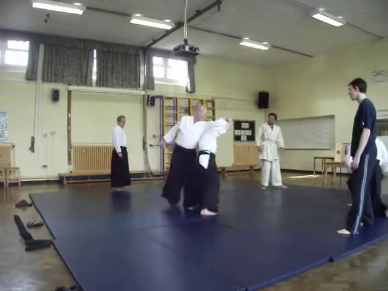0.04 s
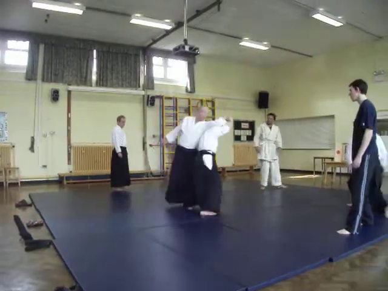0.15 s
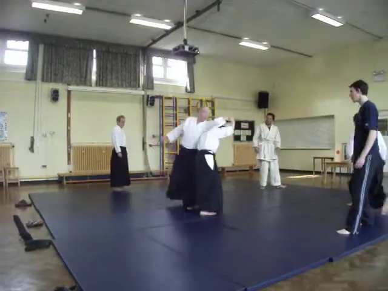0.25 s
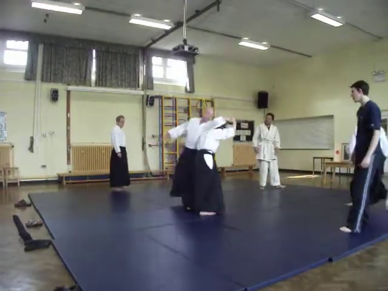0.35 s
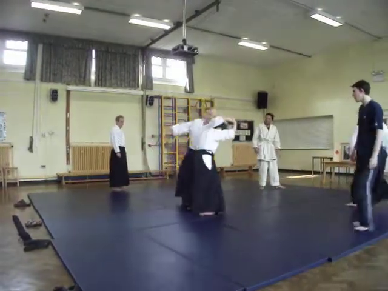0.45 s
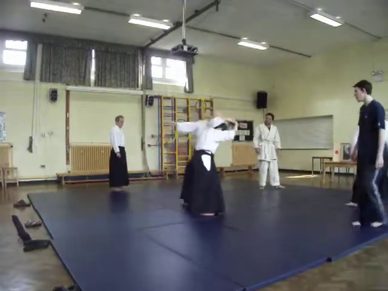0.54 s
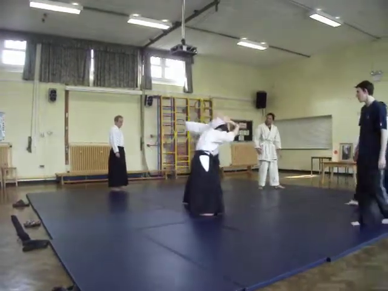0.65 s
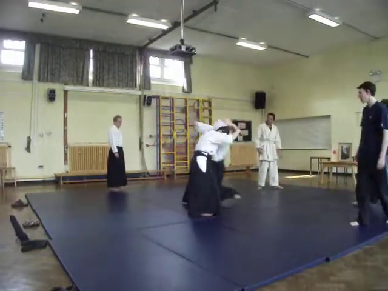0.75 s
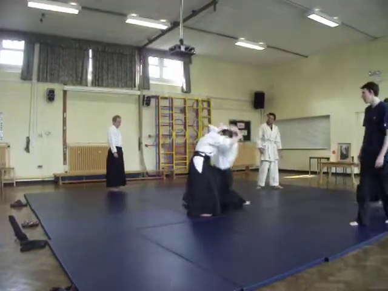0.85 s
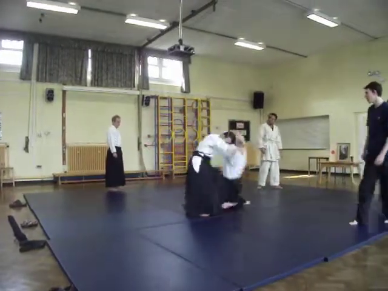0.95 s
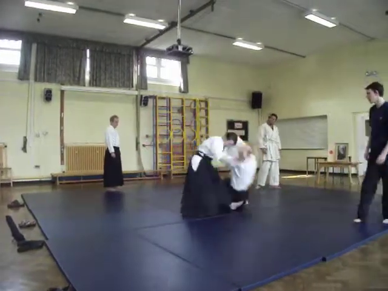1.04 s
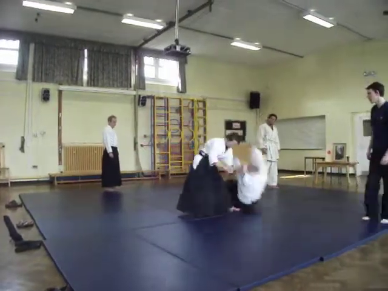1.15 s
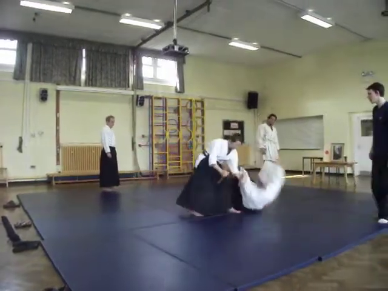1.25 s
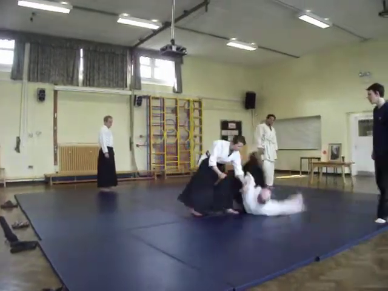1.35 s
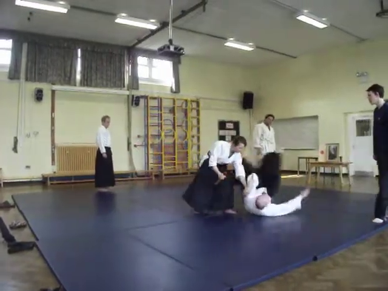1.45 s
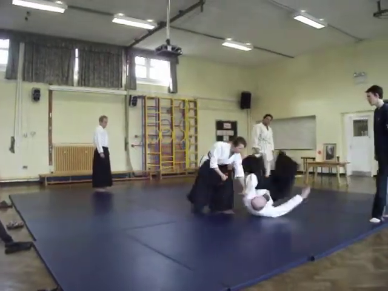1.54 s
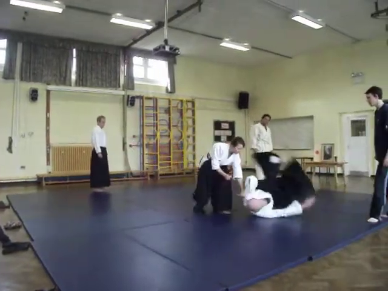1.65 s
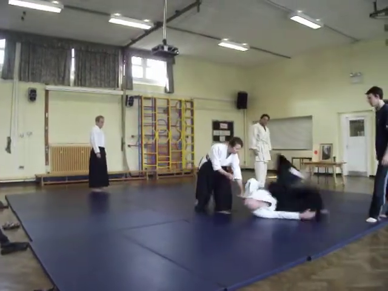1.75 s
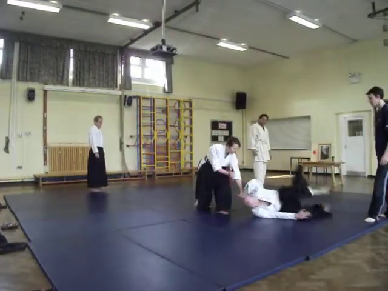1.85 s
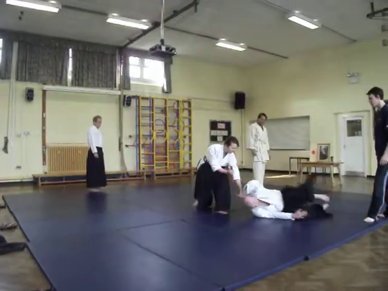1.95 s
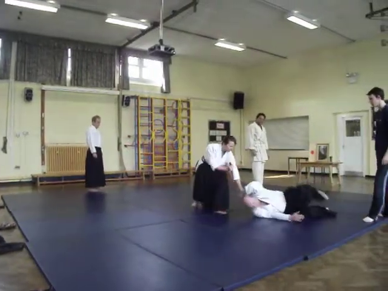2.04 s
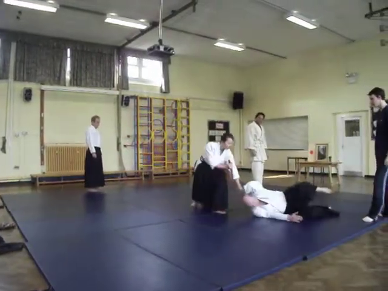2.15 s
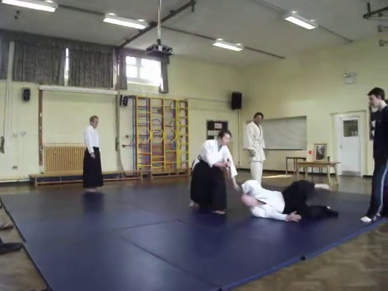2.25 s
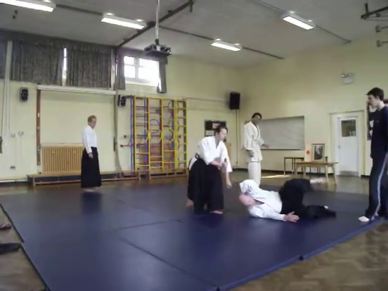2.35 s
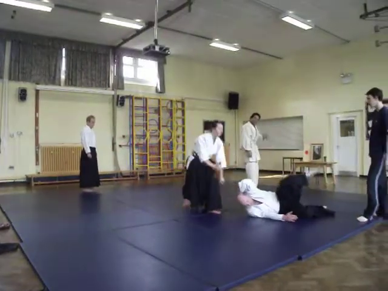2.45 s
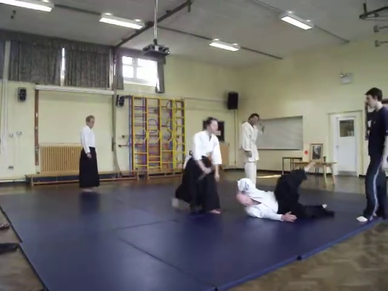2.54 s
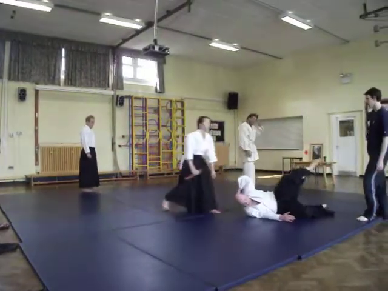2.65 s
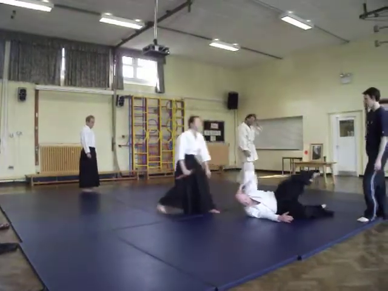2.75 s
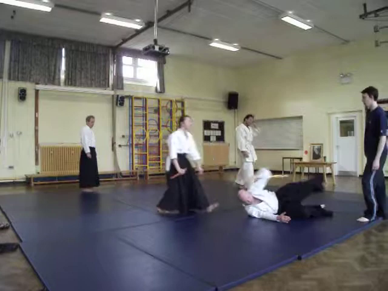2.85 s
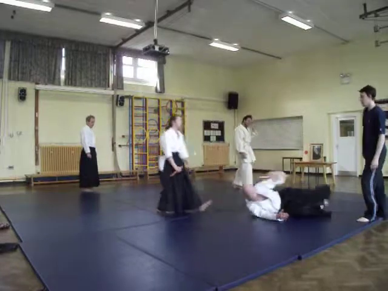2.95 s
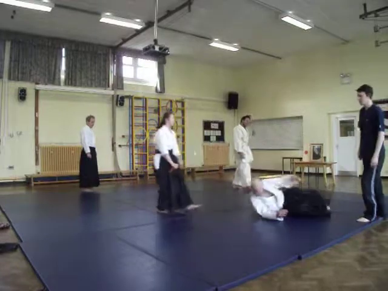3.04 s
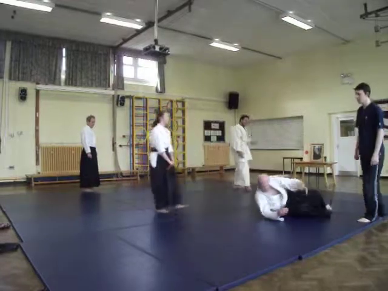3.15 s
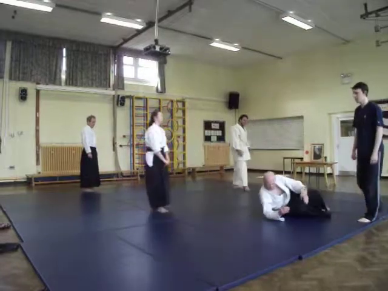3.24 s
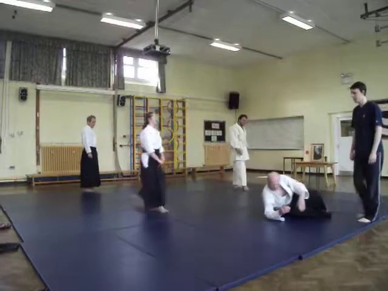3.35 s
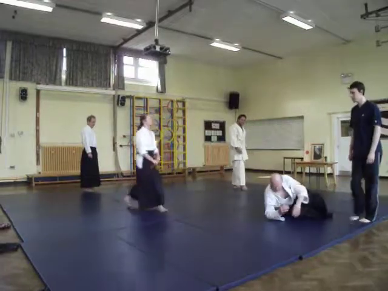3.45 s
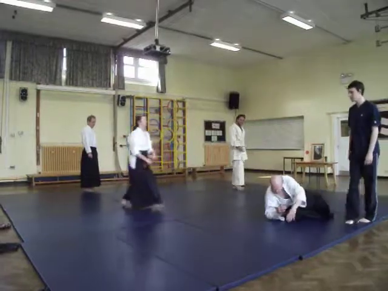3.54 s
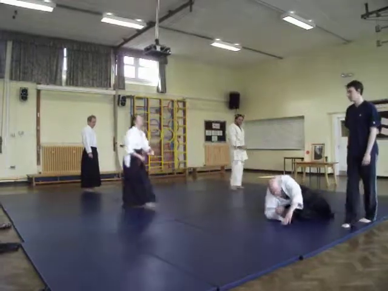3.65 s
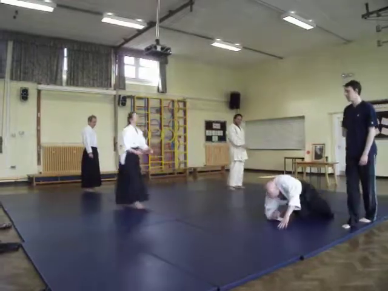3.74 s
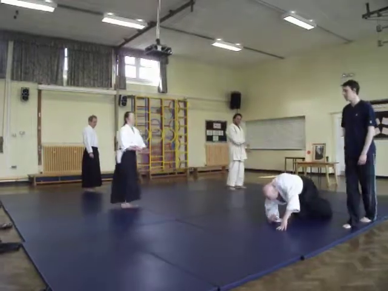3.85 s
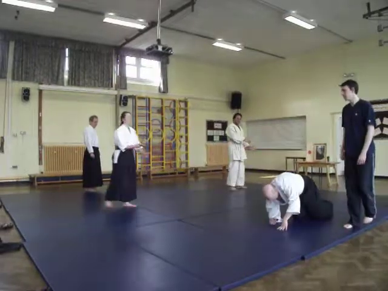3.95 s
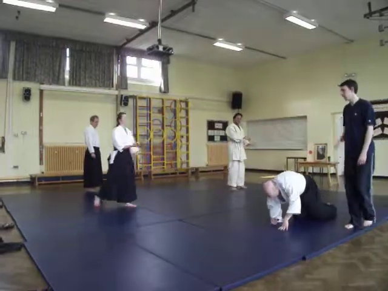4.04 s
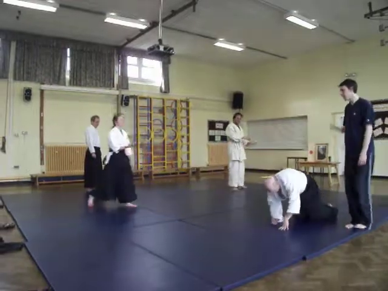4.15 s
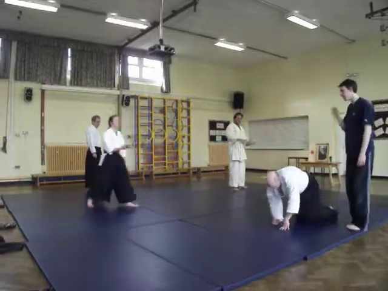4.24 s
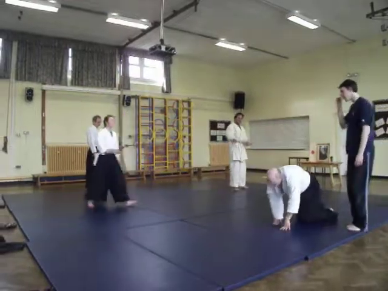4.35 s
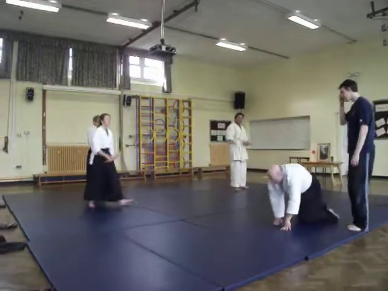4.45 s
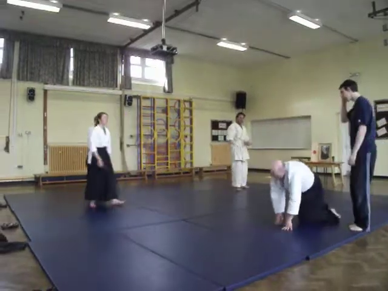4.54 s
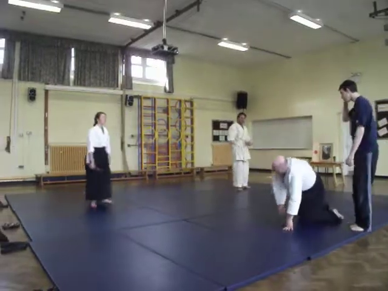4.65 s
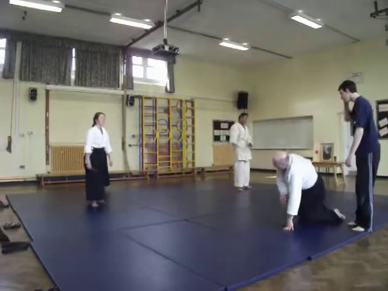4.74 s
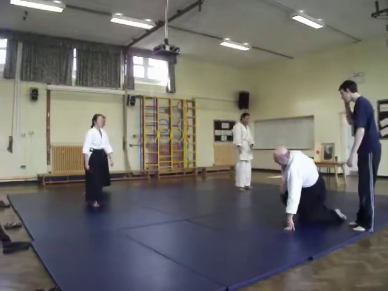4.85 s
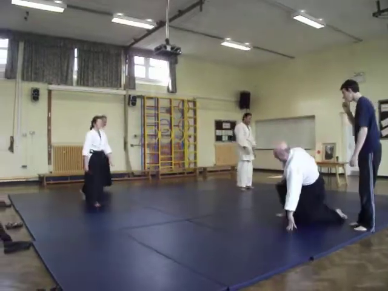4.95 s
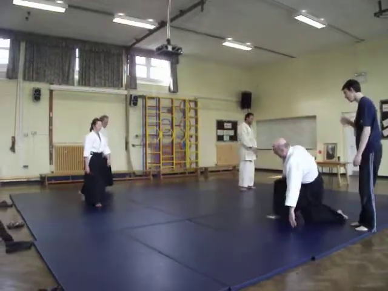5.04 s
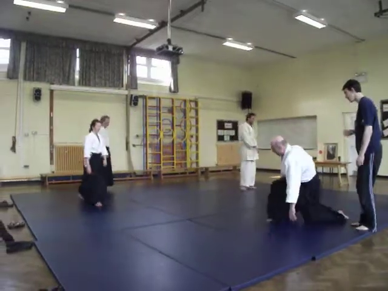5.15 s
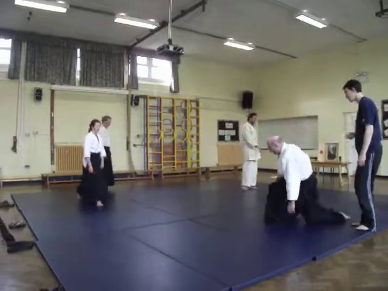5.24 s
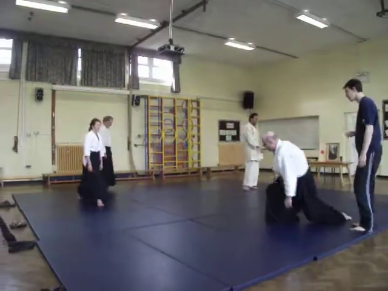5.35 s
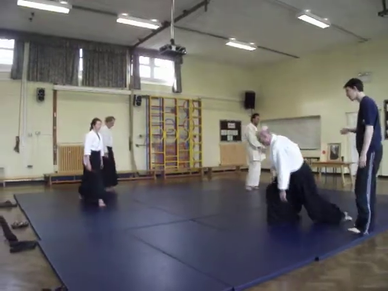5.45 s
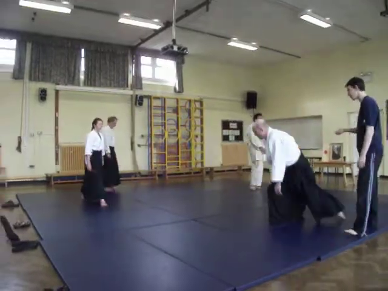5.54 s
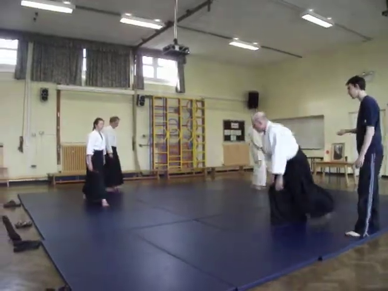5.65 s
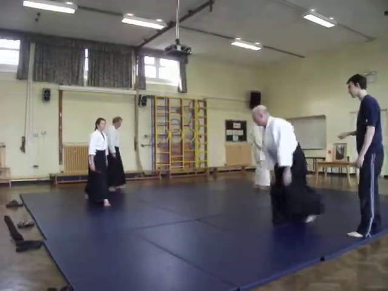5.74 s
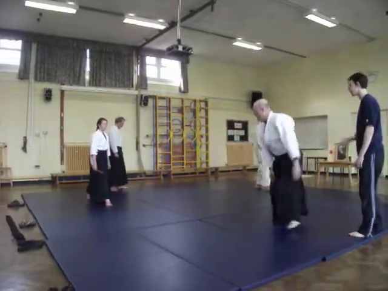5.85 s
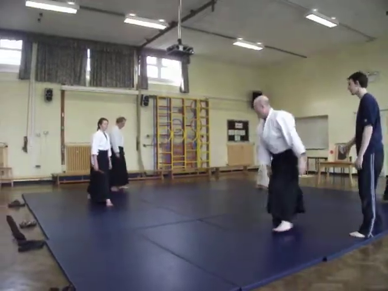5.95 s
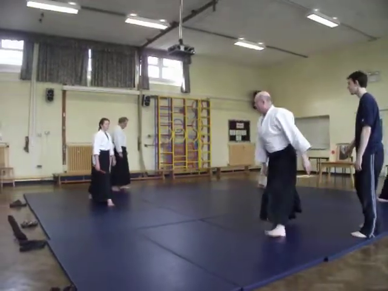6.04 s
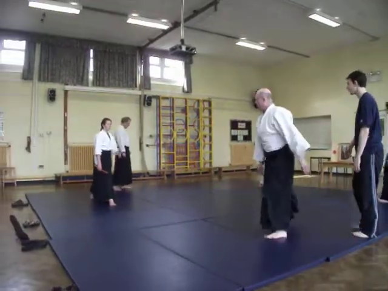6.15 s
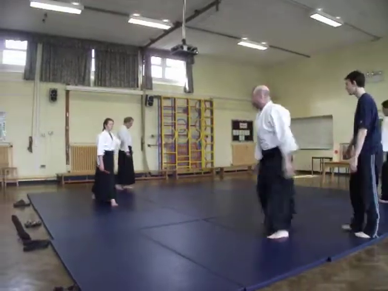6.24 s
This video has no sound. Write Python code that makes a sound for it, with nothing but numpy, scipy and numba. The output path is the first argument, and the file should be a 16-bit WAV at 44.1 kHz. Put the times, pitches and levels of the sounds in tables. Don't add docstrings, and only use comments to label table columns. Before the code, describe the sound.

In a reverberant gym hall, a small camera microphone hisses steadily over low rumble. Light foot knocks and a sharp slap on a padded mat come first, then a body lands hard: a loud clipped slap and hollow thud, followed by a tumble of further blows as the legs come down. The echo fades over about a second, leaving soft steps, dry ticks, small knocks and a faint low engine drone.

```python
import sys
import numpy as np
from scipy import signal
from scipy.fft import rfft, irfft
from scipy.io import wavfile
from scipy.ndimage import uniform_filter1d
from numba import njit

SR = 44100
rng = np.random.default_rng(int(sys.argv[2]) if len(sys.argv) > 2 else 0)


def invert_db(level):
    return 10 ** (np.asarray(level, dtype=float) / 20)


def wrap_up_sound(samples):
    columns = np.atleast_2d(samples).T
    tamed = np.clip(columns, -1, 1)
    steps = np.round(tamed * 32767).astype(np.int16)
    wavfile.write(sys.argv[1], SR, steps)


N = 278226


def table(rows, hz):
    f, v = np.transpose(rows)
    return np.interp(np.log(np.maximum(hz, 1)), np.log(f), v)


def colour(x, rows):
    size = 2 ** 13
    log_gain = table(rows, np.fft.rfftfreq(size, 1 / SR)) * np.log(10) / 20
    cepstrum = irfft(log_gain)
    cepstrum[1:size // 2] *= 2
    cepstrum[size // 2:] = 0
    impulse = irfft(np.exp(rfft(cepstrum)))
    return signal.fftconvolve(x, impulse)[:len(x)]


def band(x, lo_hz, hi_hz, order=2):
    return signal.sosfilt(signal.butter(order, [lo_hz, hi_hz], "band", fs=SR, output="sos"), x)


def unit(x):
    return x / np.sqrt(np.mean(x ** 2))


def peak_unit(x):
    return x / np.abs(x).max()


def walk(rate_hz):
    hold = int(SR / rate_hz)
    steps = np.repeat(rng.standard_normal(N // hold + 1), hold)
    return uniform_filter1d(uniform_filter1d(steps, hold), hold)[:N]


def add(out, start_s, sound):
    i = int(start_s * SR)
    out[i:i + len(sound)] += sound[:N - i]


def flicker(x, lo_hz, count, wobble_db):
    octave = np.log2(np.fft.rfftfreq(N, 1 / SR) / lo_hz + 1e-9)
    spectrum = rfft(x)
    out = 0
    for k in range(count):
        weight = np.cos(np.pi * np.clip(octave - k / 2, -.5, .5)) ** 2
        out = out + invert_db(wobble_db * walk(9)) * irfft(spectrum * weight, N)
    return unit(out)


# frequency_hz, density_db per Hz
RUMBLE_SPECTRUM = [(12, -30.5), (20, 2), (108, -10.5), (161, -6), (244, -13.5), (350, -5.5), (460, -40),
                   (770, -120)]


def rumble():
    return flicker(colour(rng.standard_normal(N), RUMBLE_SPECTRUM), 13, count=10, wobble_db=3.0)


# time_s, level_db
DRONE_LEVEL = [
    (0, -47),
    (.6, -69.5),
    (2.2, -42.5),
    (2.6, -39.5),
    (4.1, -50.5),
    (4.8, -53),
    (5.1, -46),
    (6.31, -37.5),
]


def drone():
    centre_hz = 79.7
    hum = unit(band(rng.standard_normal(N), centre_hz - 12, centre_hz + 12))
    return invert_db(np.interp(np.arange(N) / SR, *np.transpose(DRONE_LEVEL))) * hum


# frequency_hz, density_db per Hz
HISS_SPECTRUM = [(300, -4), (600, -7), (1100, -5.5), (1480, -9.5), (1800, -4.5), (2100, -9.5), (2500, -0.5),
                 (2850, 1), (3150, -5.5), (3500, -13.5), (4200, -22), (5000, -23.5), (5500, -30),
                 (6200, -50)]


def rustle_and_hiss():
    grit = 1 + (rng.random(N) < 40 / SR) * 6.
    hiss = colour(rng.standard_normal(N) * grit, HISS_SPECTRUM)
    rustle = flicker(hiss, 402.0, count=5, wobble_db=-1.0)
    upper = flicker(hiss, 375 * 2 ** 2.5, count=5, wobble_db=1.2)
    return rustle, upper


# time_s, stir_db
STIR_LEVEL = [(0, 3.5), (.7, -1.5), (1.2, 4), (2.3, -4), (2.65, -3), (3.2, -2), (3.8, -1), (4.2, 1.5),
              (5.0, 1), (5.6, 2.5), (6.31, 3.5)]


def air():
    stir_db = np.interp(np.arange(N) / SR, *np.transpose(STIR_LEVEL))
    rustle, hiss = rustle_and_hiss()
    return (invert_db(-41 + 0.34 * stir_db) * rumble() + drone()
            + invert_db(-42.5 + stir_db) * rustle + invert_db(-34.5 + 0.17 * stir_db) * hiss)


# frequency_hz, t60_s
HALL_DECAY = [(40, 1.3), (125, 1.17), (300, 1.04), (1000, 1.32), (3000, 1.14), (5500, 1.35)]


def hall(build_s=0.0063, sparse_db=3.5, clump_s=0.0017):
    t = np.arange(2 * SR) / SR
    hold = int(clump_s * SR)
    clump_level = np.repeat(rng.standard_normal(len(t) // hold + 1), hold)[:len(t)]
    clumps = invert_db(sparse_db * np.exp(-t / 0.14) * clump_level)
    out = 0
    for hz in 28 * 2 ** np.arange(0, 8.1, .5):
        echoes = band(rng.standard_normal(len(t)) * clumps, hz / 2 ** 0.22, hz * 2 ** 0.24)
        out = out + echoes * invert_db(-60 * t / table(HALL_DECAY, hz))
    out = out * (1 - np.exp(-t / build_s))
    return out / np.sqrt(np.sum(out ** 2))


# frequency_hz, width_hz, level_db
FLOOR_MODES = [(59, 14, -1.5), (120.6, 2.3, -6), (200, 23.3, -3), (270, 44, 0.5), (402, 40, -3.5)]


def boards(x):
    out = x
    for hz, width_hz, level_db in FLOOR_MODES:
        out = out + invert_db(level_db) * band(x, hz - width_hz / 2, hz + width_hz / 2, order=1)
    return out


# start_s, peak_db
TICK_EVENTS = [(0.28, -23), (0.677, -22.5), (0.768, -22), (0.786, -18.5), (0.794, -17), (0.8596, -22),
               (1.002, -21), (1.248, -23.5), (2.773, -17), (2.855, -20.5), (2.995, -23), (3.087, -21.5),
               (3.157, -24.5), (3.2, -22.5), (3.261, -22), (3.794, -21), (4.5646, -21.5), (4.647, -25),
               (4.9805, -21.5), (5.025, -27), (5.082, -22), (5.3533, -25), (5.415, -22), (5.4316, -18),
               (5.483, -19), (5.536, -25), (5.823, -24.5), (5.924, -23.5), (6.013, -26), (6.287, -20.5)]


def ticks():
    out, t = np.zeros(N), np.arange(SR // 40) / SR
    rise_s, decay_s = .001, .002
    for start_s, peak_db in TICK_EVENTS:
        grit = rng.standard_normal(len(t)) * (1 - np.exp(-t / rise_s)) * np.exp(-t / decay_s)
        ring = band(grit, 2300, 3150)
        top = band(grit, 3300, 4300, order=3)
        add(out, start_s, invert_db(peak_db) * (peak_unit(ring) + invert_db(-15) * peak_unit(top)))
    return out


SOLE_HZ = 211


def tick_bodies():
    silent_db = -60
    return [(s, db - 9, db - 18, silent_db, SOLE_HZ, silent_db) for s, db in TICK_EVENTS]


# start_s, weight_db, thud_hz
TREAD_EVENTS = [
    (.27, -30, 200),
    (0.831, -27.5, 250),
    (1.261, -21.5, 161.6),
    (2.714, -23.5, 173),
    (2.81, -21, 170),
    (2.85, -21.5, 200),
    (3.3, -27, 166),
    (4.6371, -25.5, 109),
    (5.951, -31.5, 132),
    (6.05, -27.5, 270),
]


def treads():
    return [(s, db - 9.5, db + 5, db + 1.5, hz, db) for s, db, hz in TREAD_EVENTS]


# start_s, thud_db, thud_hz
KNOCK_EVENTS = [(.566, -6.5, 330), (0.586, -7.5, 435), (0.608, -9, 267), (0.628, -7, 200),
                (0.657, -12, 232), (1.344, 3.5, 397), (1.368, 8.5, 296), (1.425, 9, 249.5),
                (1.715, 2.5, 220), (3.07, -19, 50), (3.511, -19, 44.9), (4.646, -16, 220),
                (4.68, -16.5, 306), (4.7, -19, 396), (4.726, -13.5, 324), (5.441, -6.5, 880),
                (5.45, -14.5, 710), (6.178, -20.5, 134)]


def knocks():
    return [(s, db - 18.5, db - 17.5, db, hz, db - 15) for s, db, hz in KNOCK_EVENTS]


# start_s, slap_db, hall_slap_db, weight_db
SLAP_EVENTS = [
    (0.553, -23, -24.5, -15),
    (0.786, -24, -26, -25.5),
    (0.7985, -5.5, -11.5, -13),
    (0.8077, -10.5, -27.5, -23.5),
    (1.0036, -20, -24, -19.5),
    (1.304, -18, -23.5, -21),
    (2.7765, -10, -12.5, -20),
    (2.928, -18, -18, -23),
    (4.751, -21, -24.5, -35),
    (4.8, -20, -29, -38.5),
]


def slaps():
    return [(s, slap_db, ring_db, db + 5.5, SOLE_HZ, db) for s, slap_db, ring_db, db in SLAP_EVENTS]


# start_s, slap_db, hall_slap_db, weight_db, thud_hz
FALL_EVENTS = [(1.3411, 6.5, 2.5, 7, 187.7), (1.347, -18.5, -13, 3.5, 72.6), (1.373, -10, -0.5, -3.5, 296),
               (1.383, -4, -10, -3.5, 263), (1.4132, 1.5, -3.5, -6, 405), (1.466, 0.5, -3.5, -1, 123.5),
               (1.575, -4, -3, 0.5, 126.8), (1.714, 2, -1.5, -5.5, 153), (1.753, -10.5, -6.5, -7, 161),
               (1.776, -2.5, -0.5, -6, 129.5), (1.7846, -4.5, -11, -10.5, 200),
               (1.8144, -3.5, -8.5, -9, 168.6), (1.797, -2, -18, -5, 129.6), (1.8604, -3, -9.5, -5, 131),
               (1.905, -14, -24, -25, 160.8)]


def fall():
    return [(s, slap_db, ring_db, db - 2, hz, db) for s, slap_db, ring_db, db, hz in FALL_EVENTS]


# frequency_hz, density_db per Hz
CRACK_SPECTRUM = [(300, -15.5), (800, -11), (1500, -9), (2100, -6), (2450, -2.5), (2800, 2), (3200, -9.5),
                  (4200, -15.5), (5100, -38), (6500, -38)]


def skin_slap(click, grain, t, slap_db):
    burst = click + .13 * grain * np.exp(-t / .0015)
    snap = -colour(uniform_filter1d(burst, size=7, origin=3), CRACK_SPECTRUM)
    edge = band(burst, 4280, 5300)
    return invert_db(slap_db) * (peak_unit(snap) + invert_db(1.5 * slap_db - 19) * peak_unit(edge))


def blows(rows):
    crack, boom, far = np.zeros(N), np.zeros(N), np.zeros(N)
    t = np.arange(SR // 10) / SR
    click = band(1. * (t == 0), 600, 6000)
    for start_s, slap_db, hall_slap_db, thud_db, thud_hz, hall_thud_db in rows:
        grain = rng.standard_normal(len(t))
        thud = invert_db(-14) * np.sin(2 * np.pi * thud_hz * t) * np.exp(-t * thud_hz / 1.1)
        first_swing = thud * np.exp(-t * thud_hz / 1.13)
        add(crack, start_s, skin_slap(click, grain, t, slap_db))
        add(boom, start_s, invert_db(thud_db) * thud)
        add(far, start_s, invert_db(hall_slap_db + 15.0) * click + invert_db(hall_thud_db + 1.5) * first_swing)
    return crack, boom, far


# frequency_hz, density_db per Hz
ROOM_COLOUR = [(20, -13), (48, -4), (92, -6.5), (250, -5.5), (520, -8.5), (1100, -15.5), (1600, -18.5),
               (2100, -16.5), (2500, -10.5), (2900, -7.5), (3400, -19.5), (4200, -32.5), (5300, -42.5),
               (6200, -63.5)]


def scene():
    background, echoes = air(), hall()
    crack, boom, far = blows(fall() + slaps() + knocks() + treads() + tick_bodies())
    wet = boards(signal.fftconvolve(far, echoes)[:N])
    body = colour(invert_db(13) * boom + invert_db(22.5) * wet, ROOM_COLOUR)
    return (crack + ticks() + body + background)[None]


@njit
def follow(x, up, down):
    e, out = 0., np.empty(len(x))
    for i in range(len(x)):
        a = abs(x[i])
        e += (a - e) * (up if a > e else down)
        out[i] = e
    return out


def band_limit(x):
    return signal.sosfilt(signal.butter(12, 15870, fs=SR, output="sos"), x)


def record(dry):
    limit_db, ratio, attack_s, release_s = -9.5, 5.9, 0.0015, 0.012
    full_scale, offset = .708, -.0077
    envelope = follow(dry[0], 1 / (attack_s * SR), 1 / (release_s * SR))
    over = np.maximum(envelope / invert_db(limit_db), 1)
    held = dry[0] * over ** (1 / ratio - 1) + offset
    x = np.clip(held, -1.12 * full_scale, 1.12 * full_scale)
    x = signal.sosfilt(signal.ellip(10, .2, 100, 5866, fs=SR, output="sos"), x)
    return band_limit(np.clip(x, -full_scale, full_scale)[None])


dry = scene()
out = record(dry)
wrap_up_sound(out)
```